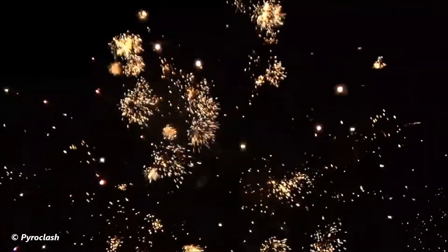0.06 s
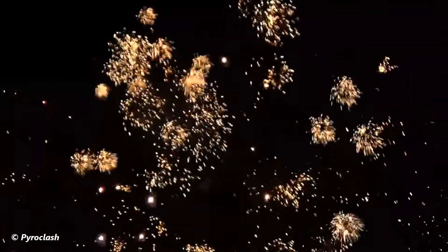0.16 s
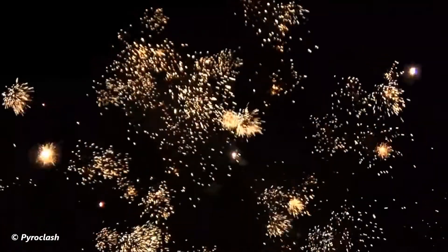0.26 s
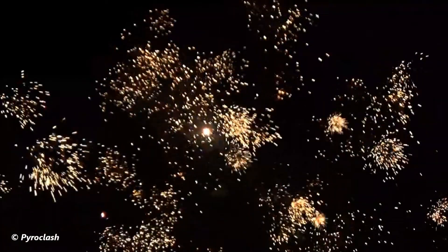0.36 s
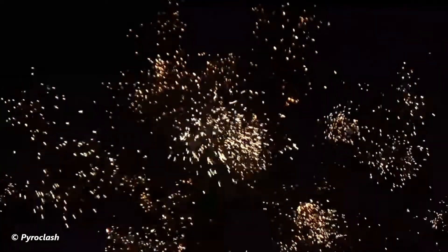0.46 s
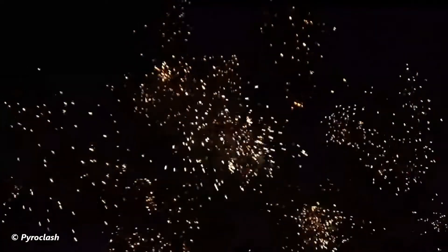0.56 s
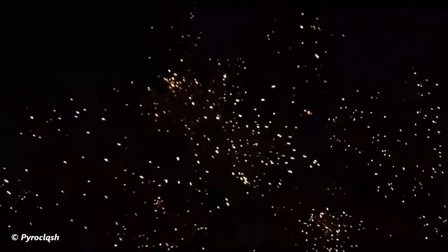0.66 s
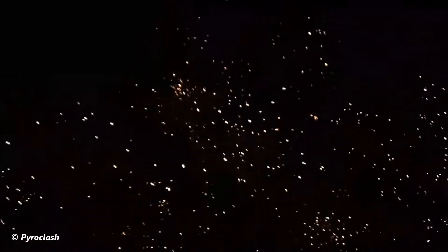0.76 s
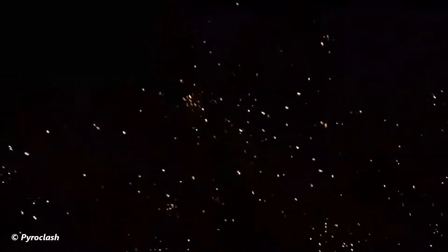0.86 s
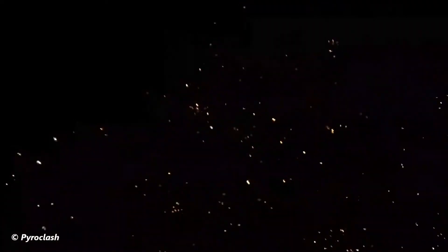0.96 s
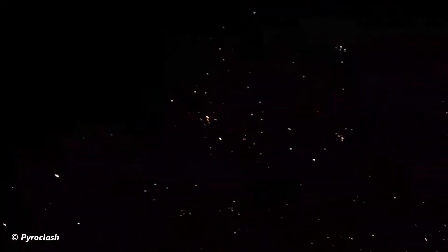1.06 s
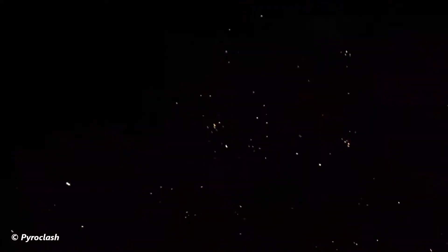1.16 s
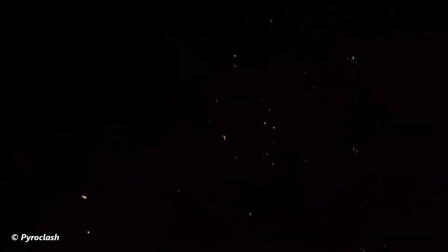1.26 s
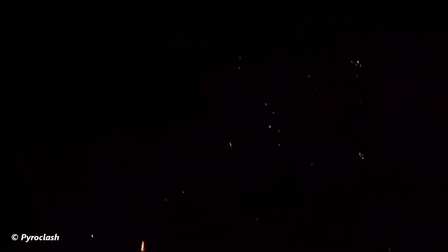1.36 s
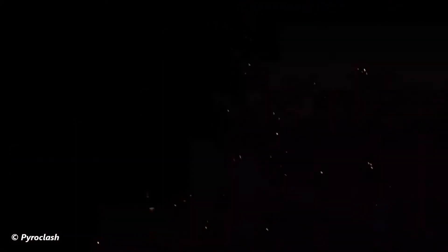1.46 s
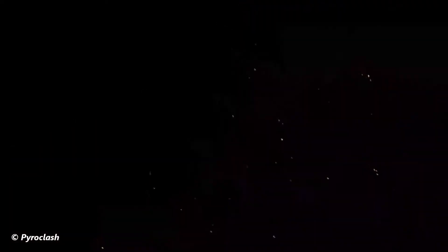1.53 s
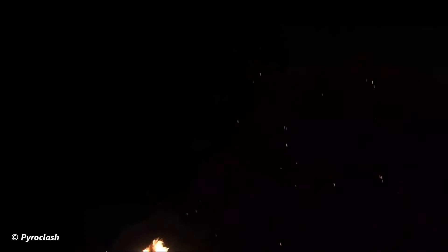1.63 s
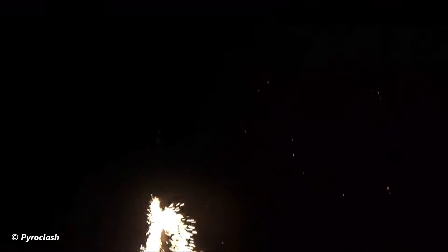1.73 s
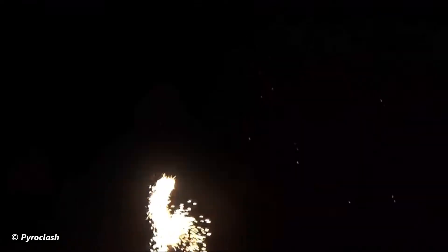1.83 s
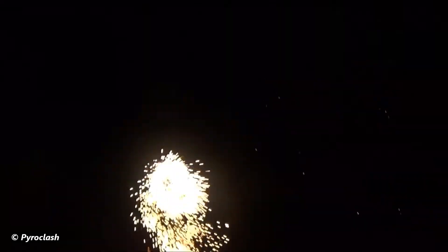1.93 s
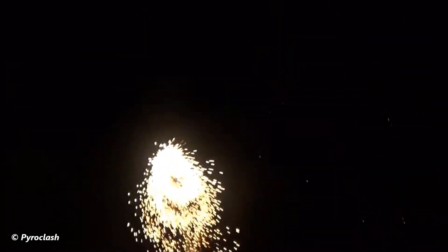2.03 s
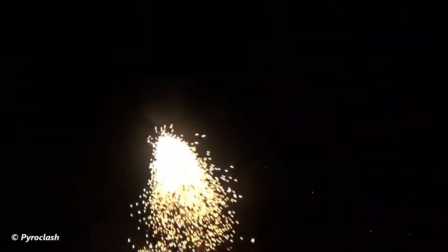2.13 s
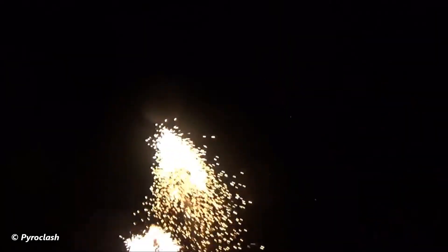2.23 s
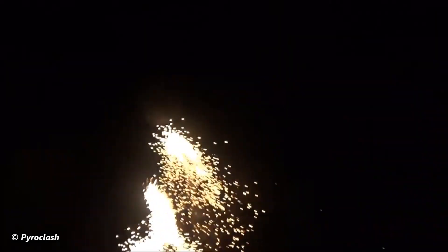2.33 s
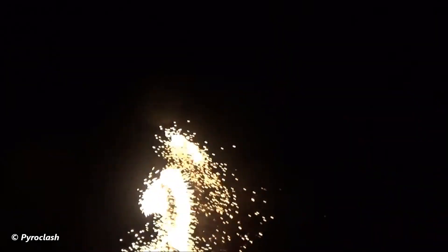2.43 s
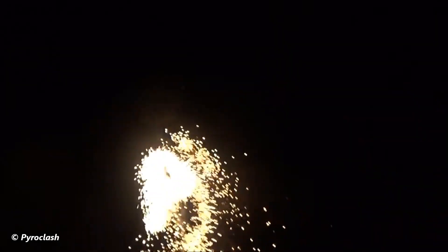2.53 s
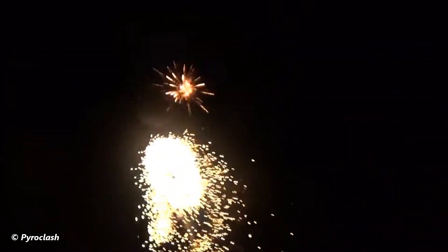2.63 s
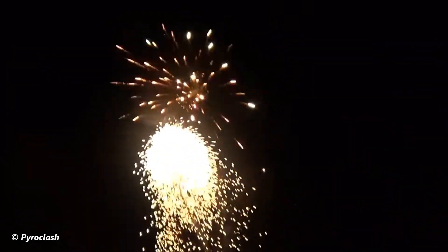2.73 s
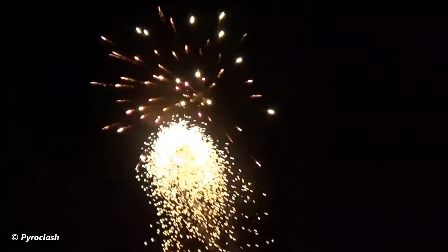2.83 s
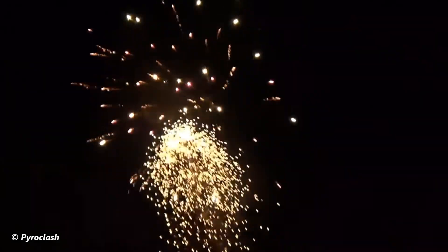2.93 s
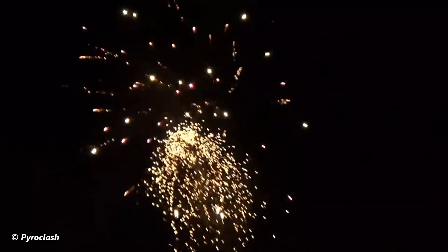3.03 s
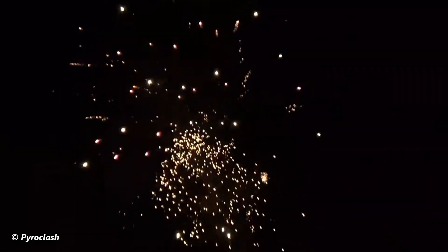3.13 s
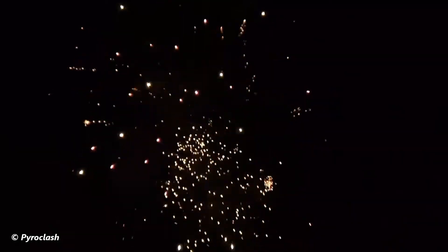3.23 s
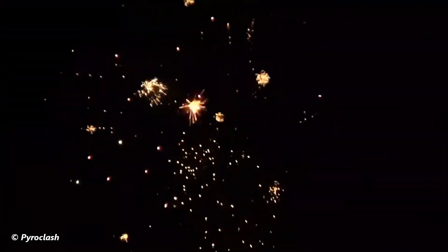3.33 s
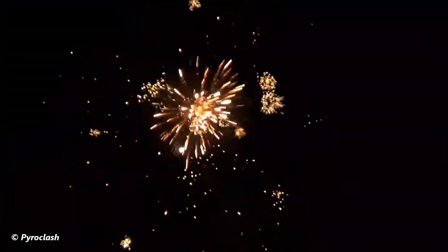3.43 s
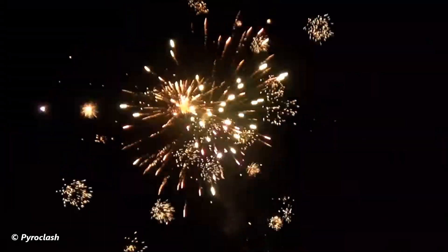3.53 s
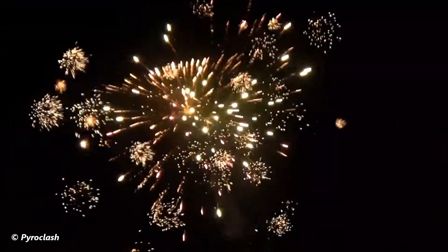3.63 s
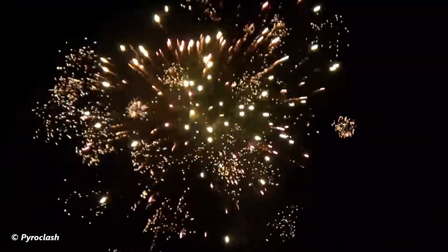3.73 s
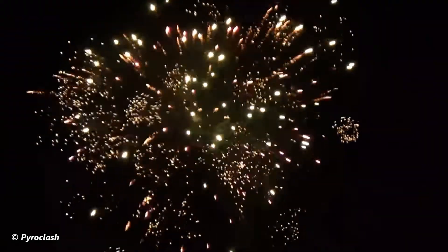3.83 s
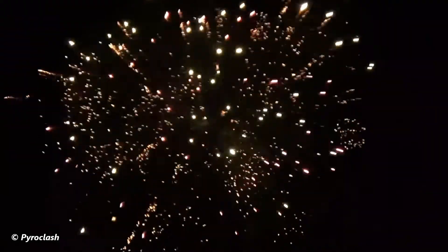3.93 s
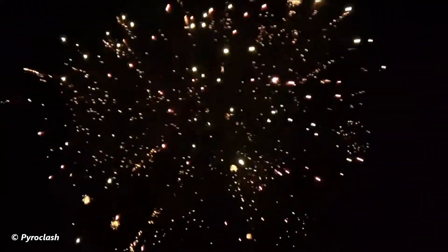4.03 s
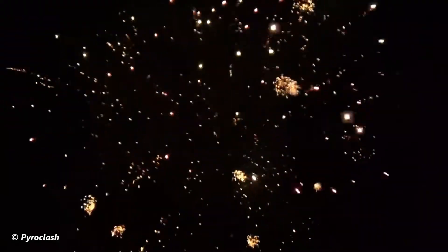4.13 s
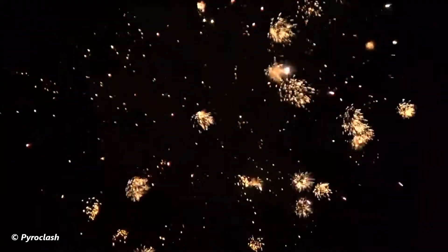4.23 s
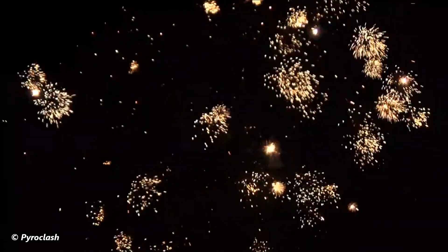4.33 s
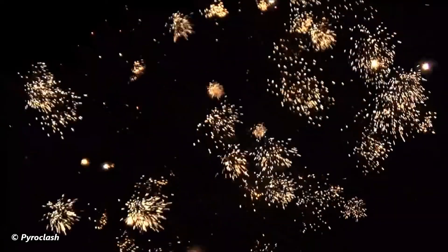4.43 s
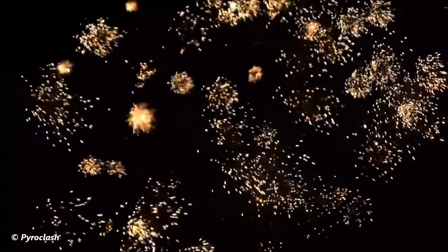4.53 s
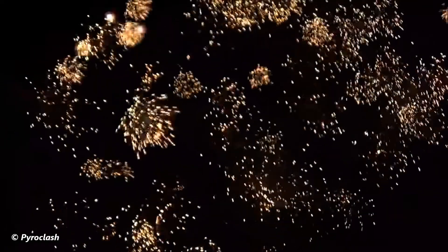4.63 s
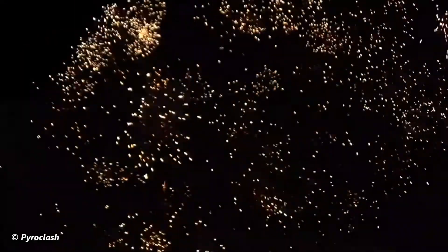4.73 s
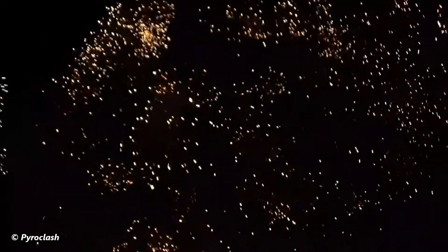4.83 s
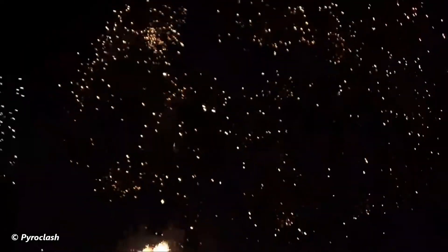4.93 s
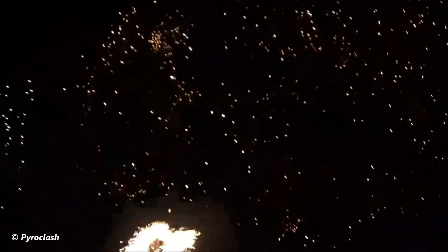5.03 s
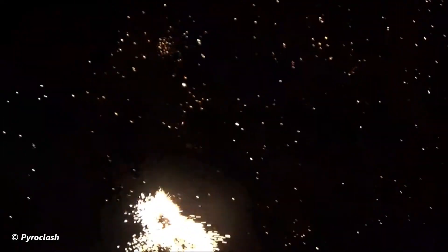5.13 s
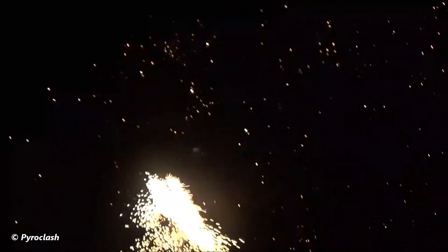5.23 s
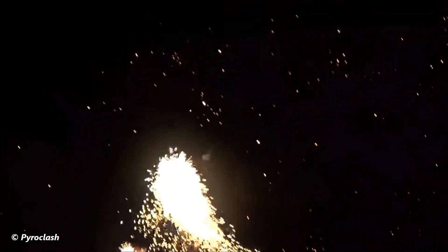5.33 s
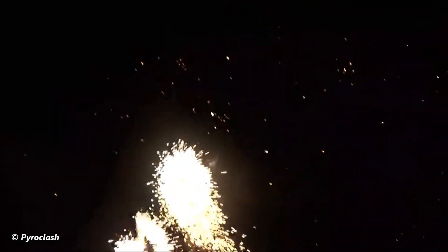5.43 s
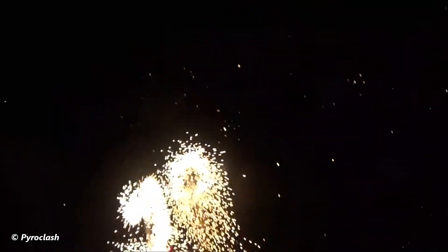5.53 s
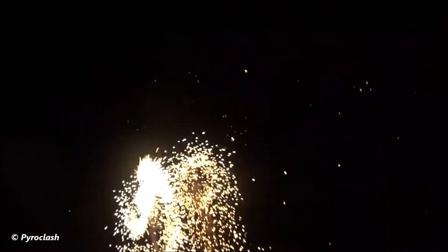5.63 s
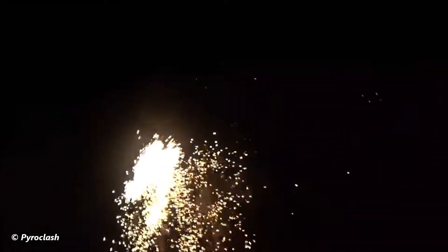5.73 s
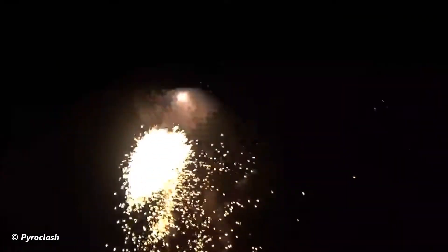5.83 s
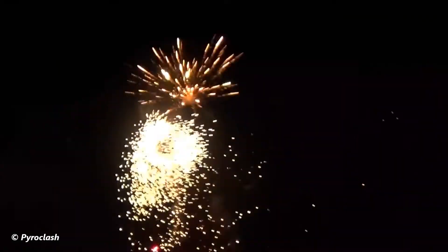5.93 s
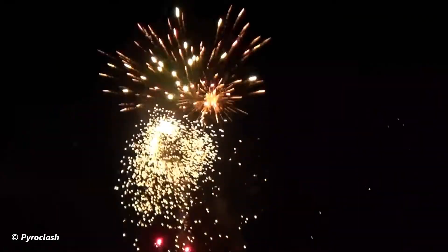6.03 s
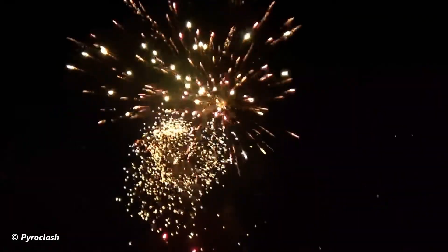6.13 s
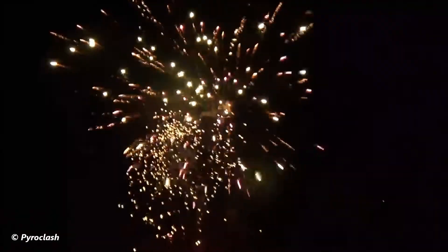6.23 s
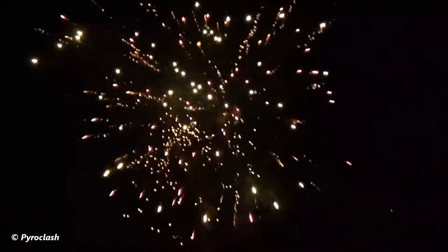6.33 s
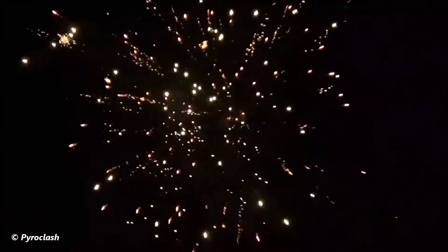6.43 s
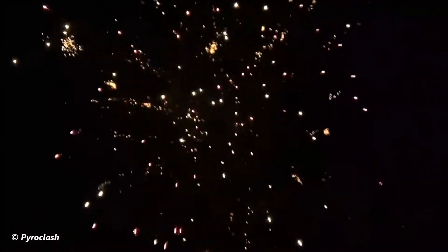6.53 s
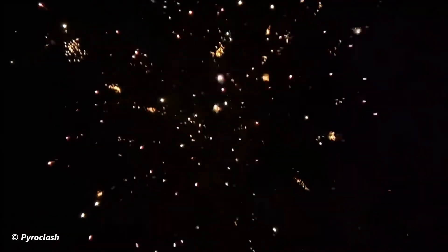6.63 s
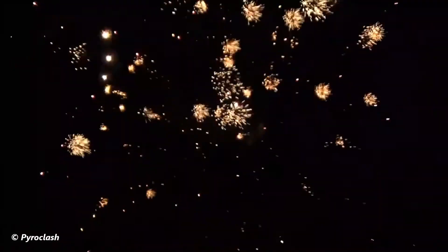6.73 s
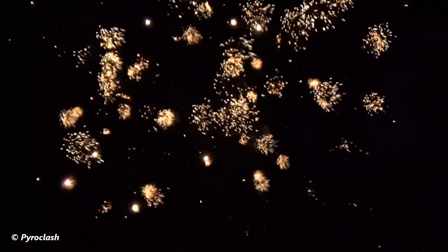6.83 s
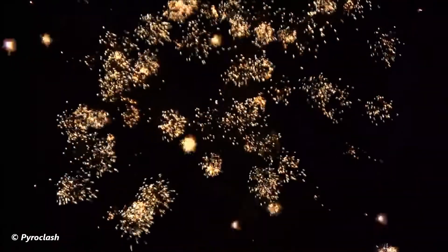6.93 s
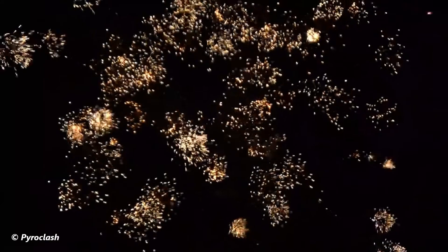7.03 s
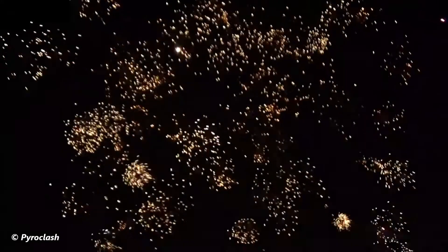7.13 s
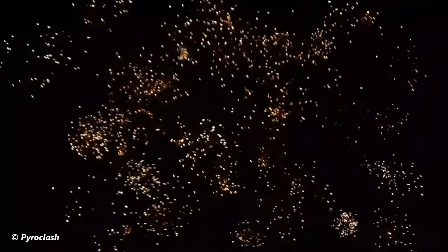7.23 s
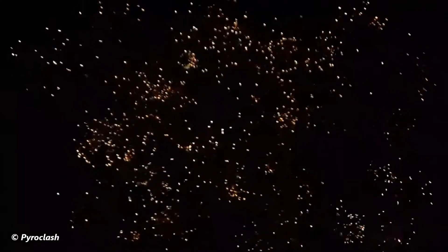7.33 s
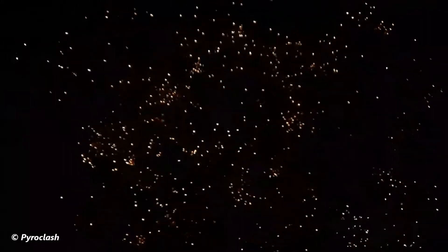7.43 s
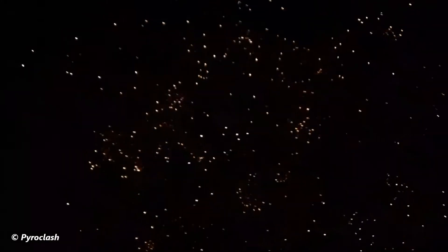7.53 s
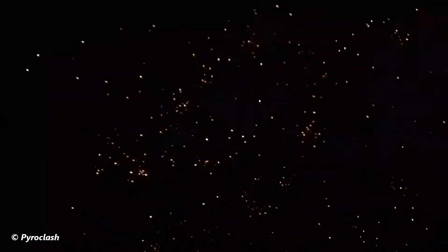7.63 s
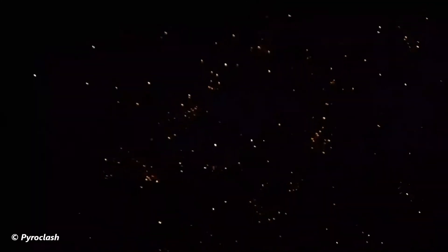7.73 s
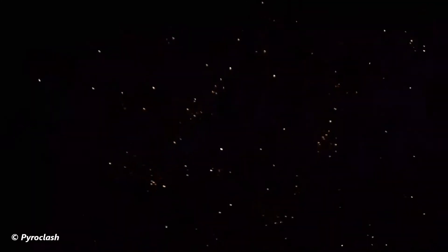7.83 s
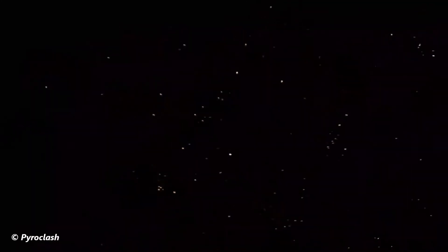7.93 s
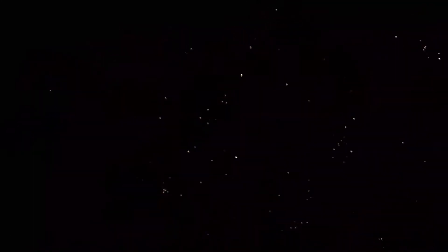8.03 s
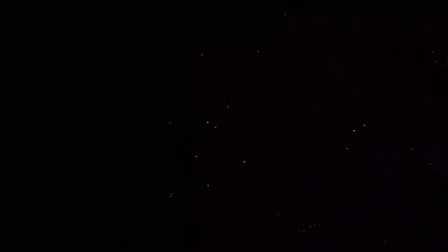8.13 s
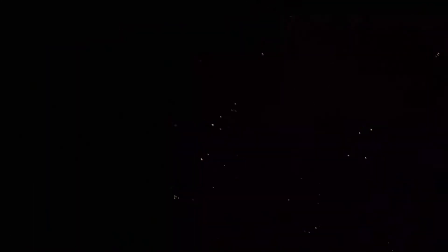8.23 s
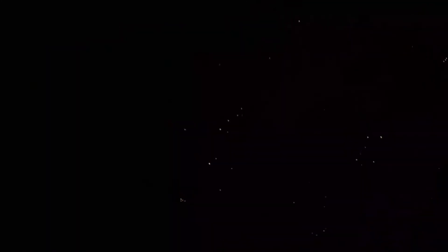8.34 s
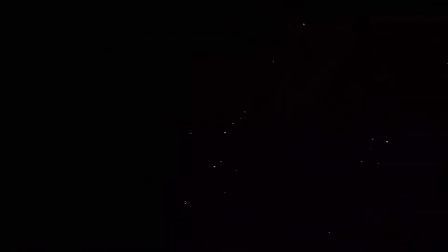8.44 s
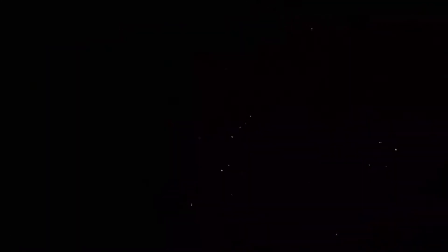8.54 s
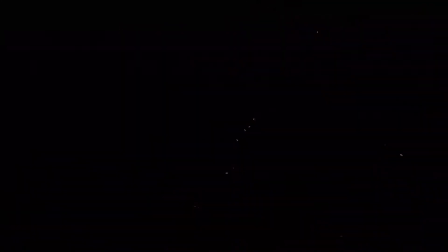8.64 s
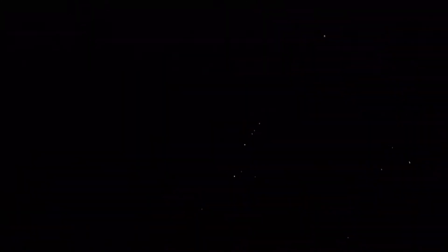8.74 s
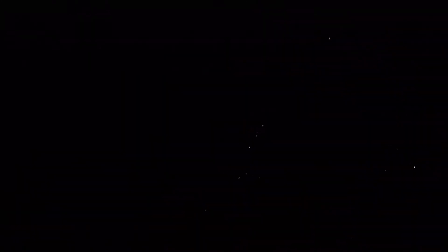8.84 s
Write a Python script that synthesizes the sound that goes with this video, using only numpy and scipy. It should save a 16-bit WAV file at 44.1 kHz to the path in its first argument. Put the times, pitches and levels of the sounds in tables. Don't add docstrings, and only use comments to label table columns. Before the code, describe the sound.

Loud crackling stars snap over the dying boom of an earlier burst. Five heavy lift shots follow with swelling comet hiss, then overhead bangs and dense crackle. Five more shots and a louder hiss lead to a close pair of bursts, a pause and another crackle. Echoes sink into quiet town rumble with faint distant shots. An overloaded camera microphone clips and ducks the echoes.

```python
import sys
import numpy as np
from scipy import signal
from scipy.fft import rfft, irfft, next_fast_len
from scipy.io import wavfile
from scipy.ndimage import map_coordinates

SR = 44100
rng = np.random.default_rng(int(sys.argv[2]) if len(sys.argv) > 2 else 0)


def nominal_scale(level):
    x = np.asarray(level, float) / 20
    return 10 ** x


def dump(signal):
    limited = np.clip(np.atleast_2d(signal).T, -1, 1)
    pcm = np.round(limited * 32767).astype(np.int16)
    wavfile.write(sys.argv[1], SR, pcm)


N = 391166
TOP_HZ = 11080
BURST_BOUNCE_MS = 10.15

# start_s, end_s, stars_per_s, clatter_db
CLOUDS = [(0.101, 0.483, 192, -19.5), (3.629, 3.67, 150, -21), (3.744, 3.851, 120, -25),
          (4.37, 4.772, 160, -20), (6.913, 7.227, 148, -23.5)]
# start_s, peak_db, ground_bounce_ms, bounce_db, street_db
LIFTS = [(1.0538, -12, 4.8, 2.5, -18), (1.2976, -8, 1.7, -9, -19), (1.5972, -6.5, 7.2, -1, -18),
         (1.841, -14, 3.8, 4, -18.5), (2.0895, -6, 3.3, -12, -20), (4.2250, -12, 8.6, 0.5, -18.5),
         (4.5086, -7, 3.2, -3.5, -14.5), (4.7886, -5, 3.1, -10, -17), (5.017, -12, 2.9, -1, -21),
         (5.3786, -4, 3, -16, -24)]
# start_s, peak_db, fence_db, street_db
BURSTS = [(2.7691, -8.5, -22, -14), (3.5158, -7.5, -21.5, -12.5), (3.6635, -8.5, -26, -15.5),
          (6.0222, -6.5, -20.5, -11.5), (6.1795, -7, -24, -15.5)]
# start_s, peak_db, ground_bounce_ms, bounce_db, street_db
FAR = [(2.3913, -12.5, 3.8, -1, -44), (8.2182, -25, 5, -9, -47), (8.2757, -24, 4.5, -6, -46),
       (8.432, -26, 5.1, -7, -46), (8.7692, -25, 7.9, 2, -43.5), (8.782, -25.5, 5.4, 2, -46),
       (8.7915, -25, 5.9, 1, -57), (8.803, -27, 4.3, 3, -58)]


def unit(x):
    return x / np.sqrt(np.mean(x ** 2) + 1e-20)


def along(points, hz):
    f, v = np.transpose(points)
    return np.interp(np.log(hz + 1), np.log(f + 1), v)


def wobble(rate):
    knots = rng.standard_normal(int(N * rate / SR) + 4)
    return map_coordinates(knots, [np.arange(N) * rate / SR])


def filtered(x, response):
    m = next_fast_len(N + SR // 4)
    return irfft(rfft(x, m) * response(np.fft.rfftfreq(m, 1 / SR)), m)[..., :N]


def blasts(s, db, tau, pan_db, colour, size):
    hz = np.fft.rfftfreq(size, 1 / SR)
    jw = 2j * np.pi * hz
    at = np.floor(s * SR).astype(int) - size // 4
    shock = jw / (1 + jw * tau[:, None]) ** 2
    delay = np.exp(-jw * (s - at / SR)[:, None])
    shape = irfft(shock * colour(hz) * (hz < TOP_HZ) * delay, size)
    shape *= (nominal_scale(db) / np.abs(shape).max(axis=1))[:, None]
    index = np.clip(at[:, None] + np.arange(size), 0, N - 1).ravel()
    sides = [shape * nominal_scale(side * pan_db / 2)[:, None] for side in (1, -1)]
    return np.array([np.bincount(index, x.ravel(), N) for x in sides])


def echoes(spectrum, share, spread_db):
    # hz, likeness
    likeness = [(60, 0.54), (170, 0.88), (490, 0.71), (1400, 0.65), (4000, 0.67), (11400, 1)]
    sizes = rng.standard_normal((2, N)) * nominal_scale(spread_db * rng.standard_normal((2, N)))
    starts = (rng.random((2, N)) < share) * sizes

    def spread(hz):
        turn = np.arccos(np.clip(along(likeness, hz), 0, 1)) / 2
        return nominal_scale(along(spectrum, hz)) * [np.cos(turn), np.sin(turn)]

    mid, side = filtered(starts, spread)
    return unit(np.array([mid + side, mid - side]))


def answer(t, s, db, rise, fall, steepen):
    u = np.maximum(t - s, 0)
    return (1 - np.exp(-u / rise)) ** 2 * nominal_scale(2 * (db - fall * u - steepen * u * u))


def street_answers(t):
    # start_s, street_db
    unseen = [(-.4, -19), (.79, -43)]
    # over_street_db, rise_s, fall_db_per_s, steepening_db_per_s2
    after_lift = [(0.5, 0.0017, 12.5, 73), (-1, 0.037, 39, 70), (-1, 0.0023, 75, 5)]
    after_burst = [(-2.5, 0.001, 20.7, 19), (0.5, 0.076, 40, 21), (-5, .003, 47.4, 27)]
    after_far = [(3.5, 0.0028, 120, 5), (-10, .004, 320, 5)]

    def heard(rows, rule):
        return sum(answer(t, r[0], r[-1] + rule[0], *rule[1:]) for r in rows)

    thud = heard(LIFTS, after_lift[0])
    boom = heard(BURSTS + unseen, after_burst[0]) + heard(FAR, after_far[0])
    clatter = heard(LIFTS, after_lift[1]) + heard(BURSTS, after_burst[1]) + heard(FAR, after_far[1])
    hiss = heard(LIFTS, after_lift[2]) + heard(BURSTS, after_burst[2])
    return thud, boom, clatter, hiss


def pops():
    # start_s, peak_db, kind (0 sharp to 3 dull)
    first_stars = [(.0139, -12, 2), (.0234, -6, 2), (.0274, -8, 1), (.0978, -4, 0), (.2246, -3, 0),
                   (.4722, -7, 2), (.4768, -3, 0), (.4868, -5, 2), (.4934, -10, 2), (.5011, -6, 3),
                   (.5106, -8, 3), (.5274, -4, 2), (.539, -6, 3), (.5429, -4, 0), (.5581, -6, 3),
                   (.567, -5, 1), (.632, -11, 2), (.6416, -4, 2), (.6473, -7, 1), (.6493, -6, 2),
                   (.6542, -11, 2), (.9817, -22, 1), (1.0009, -26, 2), (1.0107, -20, 1), (1.0274, -26, 2)]
    second_stars = [(3.2821, -20, 1), (3.3311, -8, 0), (3.3392, -6, 0), (3.3844, -4, 0), (3.3934, -9, 1),
                    (3.4221, -4, 0), (3.4324, -11, 2), (3.4874, -17, 0), (3.5044, -8, 0), (3.5074, -11, 1),
                    (3.891, -4, 3), (3.8936, -4, 2), (3.9013, -8, 2), (3.9186, -3, 2), (3.9359, -4, 3),
                    (3.9666, -7, 3), (4.058, -7, 3), (4.0613, -7, 3), (4.0678, -7, 3), (4.0928, -7, 2),
                    (4.1683, -7, 0), (4.1754, -16, 1), (4.1844, -11, 1), (4.1931, -10, 0), (4.289, -6, 2),
                    (4.297, -5, 2), (4.3145, -7, 1), (4.3243, -7, 2), (4.333, -7, 1), (4.3366, -5, 2)]
    third_stars = [(6.5532, -11, 1), (6.7858, -6, 3), (6.7968, -17, 3), (6.8183, -12, 3), (6.8226, -6, 0),
                   (6.8359, -4, 1), (6.8466, -5, 0), (6.8569, -7, 2), (6.8785, -3, 2), (6.8868, -5, 1),
                   (6.8973, -8, 2), (6.9072, -5, 3), (6.9116, -8, 1), (7.2674, -10, 3), (7.29, -6, 3),
                   (7.2978, -5, 2), (7.3061, -8, 2), (7.3772, -4, 2), (7.3849, -9, 2), (7.4219, -6, 2),
                   (7.4324, -17, 3)]
    kind_shares = [.05, .25, .42, .28]
    rows = [first_stars, second_stars, third_stars]
    for start, end, rate, _ in CLOUDS:
        for share, top_db in ((1, -3.5), (.75, -13)):
            pace = share * rate
            u = rng.random((100, 3))[:int(pace * (end - start))]
            s = start + (np.arange(len(u)) + 1.4 * u[:, 0]) / pace
            peak_db = top_db - 9 * u[:, 1] ** 1.3
            kind = np.searchsorted(np.cumsum(kind_shares), u[:, 2] * .999)
            rows.append(np.c_[s, peak_db, kind])
    return np.concatenate(rows)


def stars(rows):
    # shock_ms, treble_lift_from_hz, air_loss_above_hz, suction_amount
    fronts = [
        (.08, 1900, 14000, 2.5),
        (.13, 2200, 11500, 1.3),
        (.155, 2500, 8200, .5),
        (.18, 2800, 5800, .2),
    ]
    swing_hz, swing_width_hz, small_hz = 1150, 900, 200
    s, db, kind = rows.T
    chance = rng.standard_normal((len(s), 5))
    varied = np.array(fronts)[kind.astype(int)] * np.exp(.18 * chance[:, :4])
    ms, lift_hz, loss_hz, suction = varied.T[..., None]

    def edge(hz):
        swing = 1j * hz * swing_width_hz
        trough = 1 + suction * swing / (swing_hz ** 2 - hz ** 2 + swing)
        bass_cut = 1j * hz / (small_hz + 1j * hz)
        treble = (1 + (hz / lift_hz) ** 2) / (1 + (hz / loss_hz) ** 4)
        late_lows = np.exp(-.6j * np.arctan(hz / 500))
        return treble * late_lows * trough * bass_cut

    return blasts(s, db, ms[:, 0] / 1000, chance[:, 4], edge, size=384)


def cloud_power(t, over_db, fall):
    peak_s, linger_s = 0.086, 0.033
    swell, sag = 66, 11.8
    total = 0
    for start, end, _, db in CLOUDS:
        since = t - start - peak_s
        loss_db = swell * np.maximum(-since, 0) + sag * np.clip(since, 0, end - start)
        loss_db = loss_db + fall * np.maximum(t - end - linger_s, 0)
        total = total + nominal_scale(2 * (db + over_db - loss_db))
    return total


def shots():
    # start_s, peak_db, bounce_ms, bounce_db, ducking_db, fence_db
    fence_star = (.538, -40, BURST_BOUNCE_MS, -6, 0, -25)
    wall_s, wall_db = .043, -5
    rows = [fence_star]
    rows += [(*r[:4], 5, -60) for r in LIFTS]
    rows += [(*r[:4], 0, -90) for r in FAR]
    rows += [(s + wall_s, db + wall_db, ms, bounce_db, 7, -90) for s, db, ms, bounce_db, _ in LIFTS]
    rows += [(s, db, BURST_BOUNCE_MS, 0, 13, fence_db) for s, db, fence_db, _ in BURSTS]
    return np.array(rows)


def fence_chirp(s, fence_db):
    rib = np.arange(190)
    delay = np.hypot(.06, (rib + 60) * .00064) - .02
    fade_db = -.05 * rib + 4 * np.sin(rib / 9) + 3.5 * rng.standard_normal((len(s), len(rib)))
    at = (s[:, None] + delay).ravel()
    db = (fence_db[:, None] + fade_db).ravel()
    tau, pan_db = np.full(db.size, .00008), np.full(db.size, 1.5)
    return blasts(at, db, tau, pan_db, lambda hz: 1 / (1 + (hz / 3000) ** 6), size=128)


def bangs():
    s, db, bounce_ms, bounce_db, _, fence_db = shots().T
    edge_hz = 9000 * nominal_scale(np.minimum(db + 13, 0))[:, None]

    def port(hz):
        swing = 1j * hz * 600 / (560 ** 2 - hz ** 2 + 1j * hz * 600)
        return (swing ** 2 + .14 + (hz / 7000) ** 2) / (1 + (hz / edge_hz) ** 4)

    def ground(hz):
        return port(hz) / (1 + 1j * hz / 3000)

    pan_db = rng.normal(1.4, 0.54, len(s))
    tau = np.full(len(s), .0003)
    direct = blasts(s, db, tau, pan_db, port, size=1024)
    bounce = blasts(s + bounce_ms / 1000, db + bounce_db, tau, pan_db, ground, size=1024)
    return direct + bounce + fence_chirp(s, fence_db)


def comet_power(t):
    # time_s, burn_db
    climbs = [
        [(1.0, -74), (1.1, -30.5), (1.5, -26), (1.8, -23.5), (2.2, -19.5), (2.43, -28), (2.6, -13.5),
         (2.76, -15), (3.0, -45)],
        [(4.2, -62), (4.3, -28.5), (4.75, -20), (4.95, -26.5), (5.2, -20), (5.4, -21), (5.8, -13), (6.01, -14),
         (6.25, -61)],
    ]
    total = 0
    for climb in climbs:
        burnt_out_db = 150 * np.maximum(t - climb[-1][0], 0)
        burn_db = np.interp(t, *np.transpose(climb)) - burnt_out_db
        total = total + nominal_scale(2 * burn_db) * (t > climb[0][0])
    return total


def far_cloud_power(t):
    # level_db, fall_db_per_s, steepening_db_per_s2
    decay = (-39.5, 58, 68)
    start_s, rise_s = 8.34, .006
    return answer(t, start_s, decay[0], rise_s, *decay[1:])


def beds():
    # boom_db, clatter_db, hiss_db
    night_db = (-47, -75, -66.5)
    hold_db, squeeze, slow_s = -24, 0.61, 0.017
    t = np.arange(0, N / SR + .01, .001)
    night = nominal_scale(2 * np.array(night_db))
    burn, far = comet_power(t), far_cloud_power(t)
    thud, boom, clatter, hiss = street_answers(t)
    clatter = clatter + cloud_power(t, 0, 36.7) + burn * nominal_scale(2 * -9.5) + far + night[1]
    hiss = hiss + cloud_power(t, -5.5, 60) + burn + far * nominal_scale(-22) + night[2]
    power = np.array([thud, boom, clatter, hiss, night[0] + 0 * t])
    lag = np.exp(-t[1] / slow_s)
    settled = [lag * power[:, 0].sum()]
    sensed = signal.lfilter([1 - lag], [1, -lag], power.sum(axis=0), zi=settled)[0]
    loudness = np.sqrt(power * (1 + sensed / nominal_scale(2 * hold_db)) ** -squeeze)
    return [np.interp(np.arange(N) / SR, t, v) for v in loudness]


def street():
    # hz, db_per_hz
    boom_colour = [(15, -74), (25, -50), (142, -16), (214, -8.5), (356, -1.5), (635, 0), (733, -5),
                   (1340, -6), (1790, -9), (8000, -41), (10400, -35), (17600, -120)]
    thud_colour = [(15, -61), (25, -41), (76, -24), (286, -2.5), (320, -6), (357, -0.5), (466, -7.5),
                   (609, -1.5), (794, -7), (1060, -4), (1380, -7), (1730, -5.5), (5000, -20.5), (6500, -46),
                   (11000, -120)]
    clatter_colour = [(200, -19), (500, -0.5), (1000, 0), (2000, 0.5), (4000, -3.5), (8000, -15.5),
                      (12000, -46)]
    hiss_colour = [(800, -51), (2000, -4.5), (4000, -0.5), (6000, 2), (9000, 5), (12000, -3)]
    thud, boom, clatter, hiss, town = beds()
    surge = wobble(22)
    low = thud * echoes(thud_colour, .12, spread_db=1.5) + boom * echoes(boom_colour, .12, spread_db=1.5)
    low = low * nominal_scale(4.5 + 0.33 * surge + 1.46 * wobble(45))
    clatter = clatter * nominal_scale(3.0 + 0.23 * surge + 2.04 * wobble(30))
    clatter = clatter * echoes(clatter_colour, .6, spread_db=3)
    hiss = hiss * nominal_scale(3.0 + 0.26 * surge + 2.4 * wobble(35))
    hiss = hiss * echoes(hiss_colour, .4, spread_db=3.5)
    rumble = town * nominal_scale(4.5 + 1.0 * wobble(8)) * echoes(boom_colour, 1, spread_db=.5)
    return low + clatter + hiss + rumble


def ducking(rows):
    ahead = SR // 50
    t = np.arange(-ahead, SR // 5) / SR

    def dip(attack, release):
        return np.where(t < 0, np.exp(t / attack), np.exp(-(t / release) ** 2))

    after_bang, after_pop = np.zeros(N), np.zeros(N)
    bang_rows = shots()
    after_bang[(bang_rows[:, 0] * SR).astype(int)] = bang_rows[:, 4]
    after_pop[(rows[:, 0] * SR).astype(int)] = 9 * nominal_scale(rows[:, 1])
    drop_db = signal.fftconvolve(after_bang, dip(0.0014, 0.014))
    drop_db = drop_db + signal.fftconvolve(after_pop, dip(0.0007, 0.009))
    return nominal_scale(-drop_db[ahead:][:N])


def scene():
    rows = pops()
    return street() * ducking(rows) + bangs() + stars(rows)


def roll_off(x):
    return signal.sosfilt(signal.butter(12, 12040, fs=SR, output="sos"), x)


def record(dry):
    # hz, lead_radians
    port_lead = [(0, 0.1), (430, 0.22), (5510, 0.52), (11600, 0.47)]
    ports = filtered(dry, lambda hz: np.exp(.5j * along(port_lead, hz) * [[1], [-1]]))
    clipped = ports / (1 + np.abs(ports / .95) ** 4) ** (1 / 4)
    kept = filtered(clipped, lambda hz: np.where(hz < TOP_HZ, 1, nominal_scale(-45 - (hz - TOP_HZ) / 90)))
    limited = kept / (1 + np.abs(kept / .8) ** 6) ** (1 / 6)
    return roll_off(limited)


dry = scene()
out = record(dry)
dump(out)
```